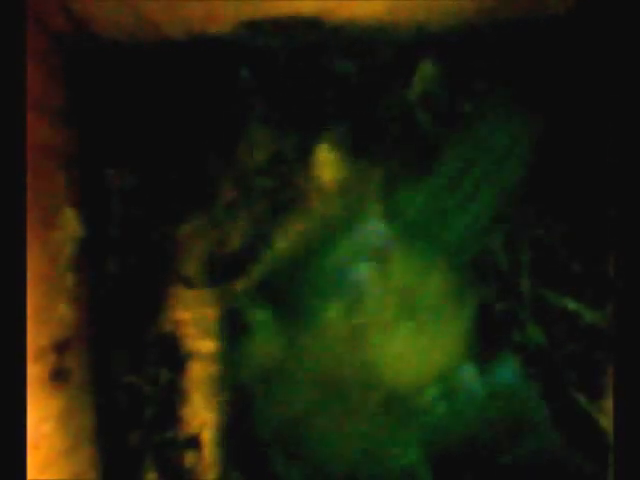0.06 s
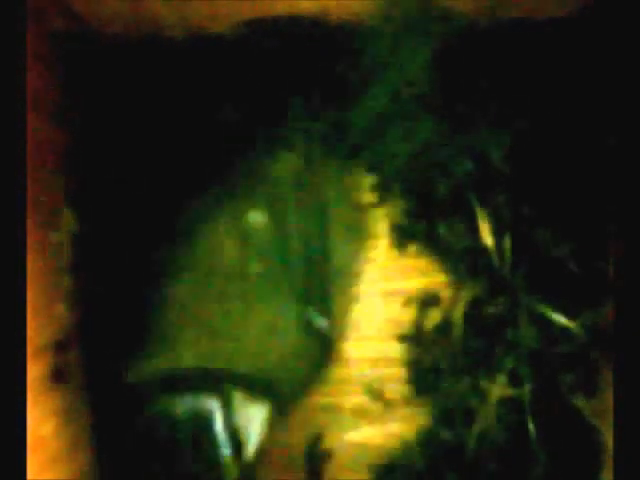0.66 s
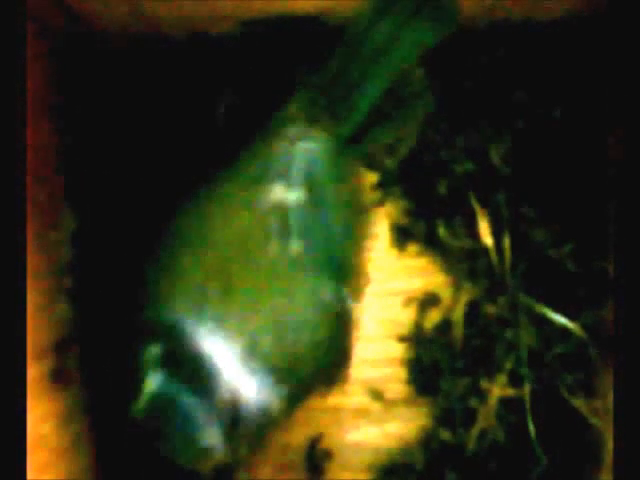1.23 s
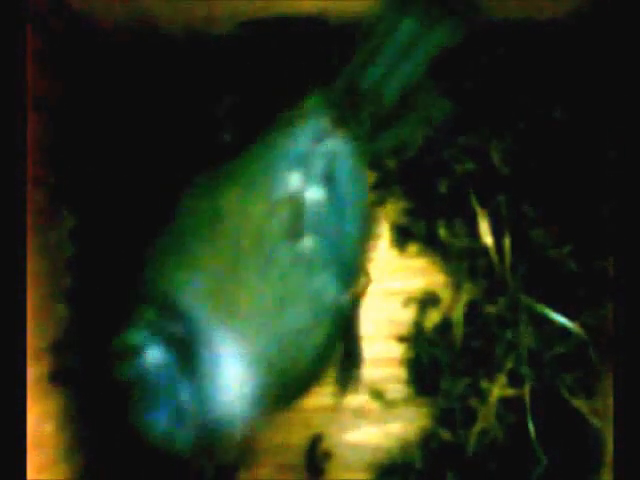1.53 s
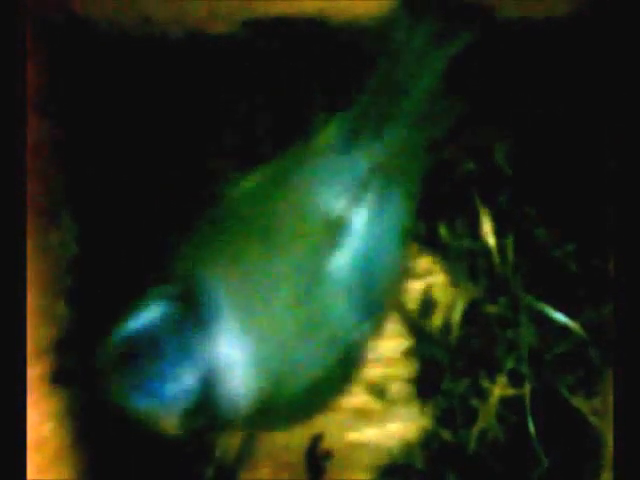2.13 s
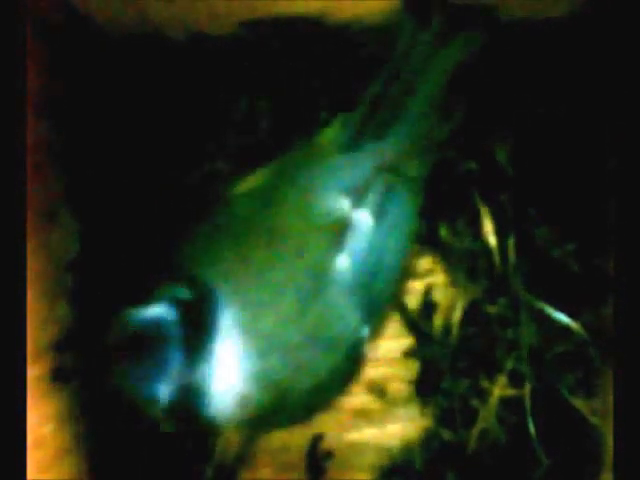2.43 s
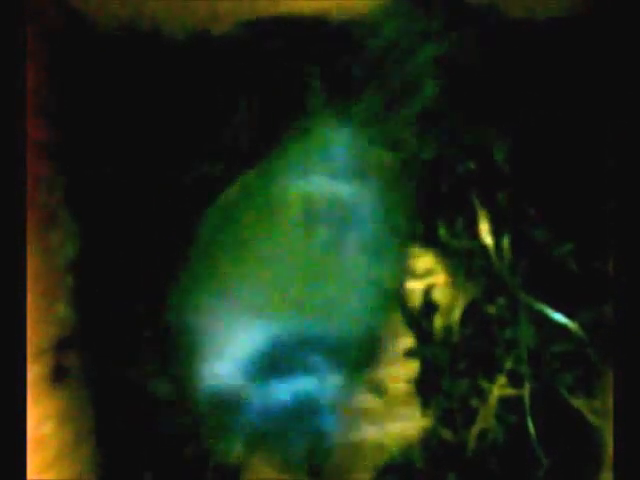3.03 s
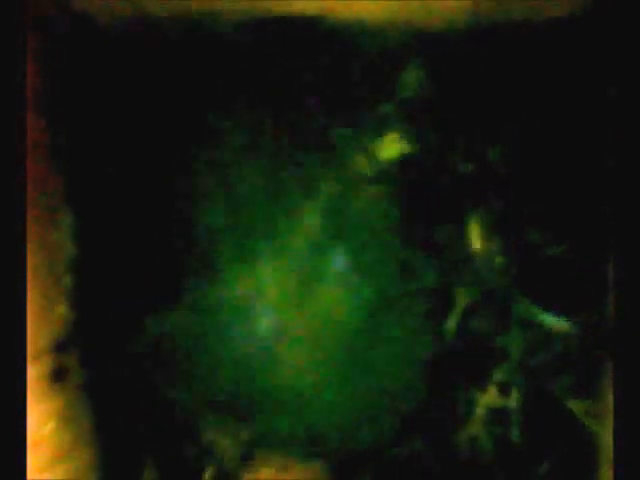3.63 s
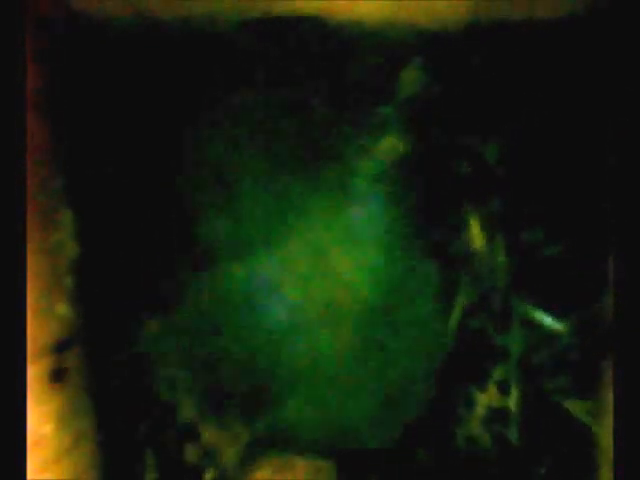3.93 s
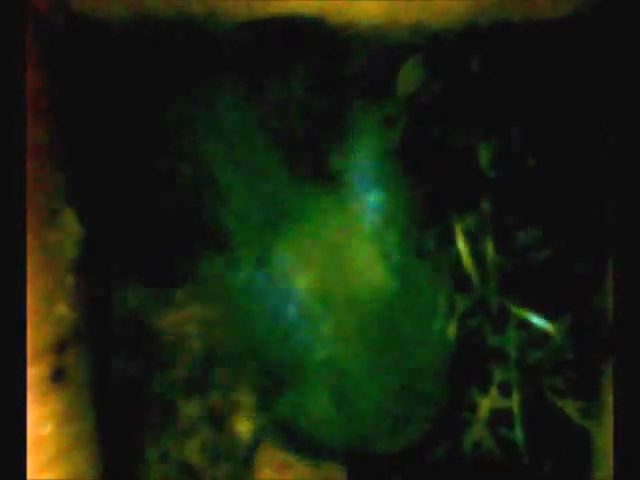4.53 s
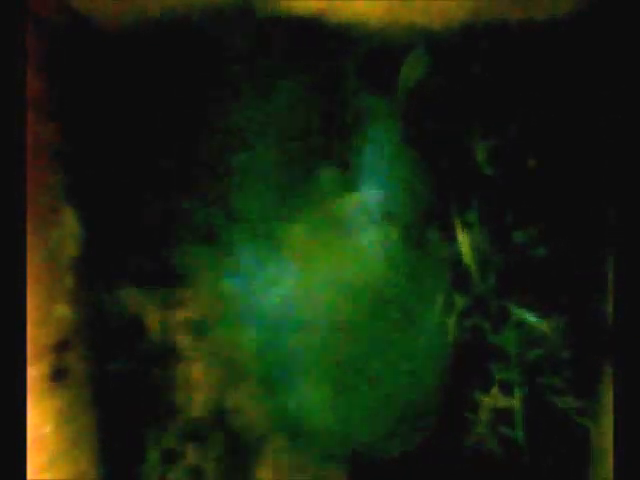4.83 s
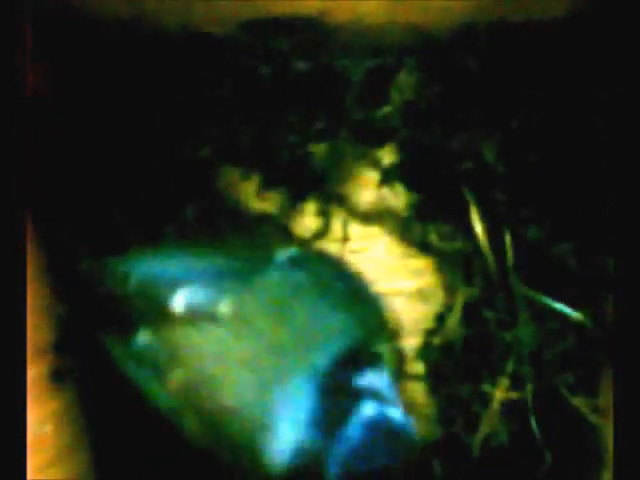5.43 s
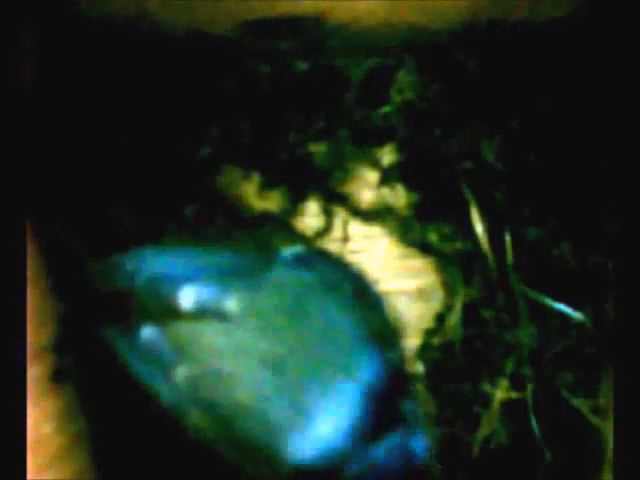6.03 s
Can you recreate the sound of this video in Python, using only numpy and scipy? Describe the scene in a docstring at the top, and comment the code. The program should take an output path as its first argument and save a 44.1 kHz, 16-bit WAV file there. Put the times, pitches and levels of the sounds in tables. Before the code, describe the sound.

A small bird moves inside a wooden nest box, very close to the microphone. For the first half second, dry stalks rustle and scrape over the boards with soft, hollow bumps, then thin to scattered claw ticks. From about 1.7 to 2.3 seconds come six quick, hard pecks, the loudest sounds, ringing the wooden walls and distorting slightly. After a lull with a few ticks, busy scratchy rustling and claw catches run from 3.2 to 5 seconds, ending in light ticks by 5.5 seconds.

A steady low outdoor rumble and the hollow hum of the box lie underneath, with a faint, thin electronic whine pulsing about eight times a second. Another bird gives three faint, short falling whistles at about 1.5, 2.1 and 2.8 seconds. A quiet, distant engine rises in pitch from about 2 to 5 seconds.

```python
"""Claws tick and dry stalks rustle as a small bird shuffles in a wooden nest box, right beside a tiny
microphone. Feathers and feet drag the nesting over the boards, and the bird's weight makes the box murmur.
Six hard pecks set the walls ringing and overload the microphone. From outside come a low rumble, a far
engine gathering speed and three faint whistles of another bird; the electronics add a thin pulsing whine."""
import sys
import numpy as np
from scipy import signal
from scipy.fft import rfft, irfft
from scipy.io import wavfile
from scipy.ndimage import uniform_filter1d

SR = 44100
rng = np.random.default_rng(int(sys.argv[2]) if len(sys.argv) > 2 else 0)


def waveform_to_disk(signal):
    """Save audio, clipped to [-1, 1], as 16-bit WAV at the path in sys.argv[1]."""
    frames = np.transpose(np.atleast_2d(signal))
    scaled = np.clip(frames, -1, 1) * 32767
    samples = np.round(scaled).astype(np.int16)
    wavfile.write(sys.argv[1], SR, samples)


N = 276507
TIME = np.arange(N) / SR

# Modes of the wooden box. Each row: frequency in Hz, relative level in dB, seconds to die away by 60 dB.
BOX_MODES = [(224, -46, 0.24), (216.4, -9, 0.21), (248.4, -11.5, 0.14), (277, -39, 0.35),
             (344.7, -13.5, 0.15), (390, -45, 0.02), (487.5, -12.5, 0.06), (781, -4, .069), (800, -13, .03),
             (1054, -14, 0.074), (1130, -45, 0.13), (1270, -35.5, 0.096), (1480, -25.5, 0.072),
             (1629, -25.5, 0.053), (1700, -19, 0.071), (1981, -4, 0.027), (2190, -32, 0.083),
             (2307, -14, 0.04), (2560, -57, 0.09), (2720, -28, 0.023), (3820, -13, 0.025),
             (5030, -15, .015)]
# Spectrum of dry stalks rubbing. Each row: frequency in Hz, relative level in dB.
FRICTION_SPECTRUM = [(400, -3), (1200, -6), (3200, -13), (4300, -0.5), (4900, -1.5), (5500, -2.5),
                     (6250, -7), (7200, -9.5), (7800, -10.5), (8550, 1), (9200, -3.5), (10200, -14.5),
                     (12500, -13.5), (16000, -27)]


def from_db(db):
    """Decibels as an amplitude factor."""
    return 10 ** (np.asarray(db) / 20)


def rms_one(x):
    """Scale a signal to rms 1."""
    return x / np.sqrt(np.mean(x ** 2) + 1e-20)


def coloured(x, spectrum):
    """Shape a texture with a spectrum of (Hz, dB) rows; rms 1."""
    hz, db = np.transpose(spectrum)
    bin_hz = np.maximum(np.arange(N // 2 + 1) * SR / N, 1)
    gain = from_db(np.interp(np.log(bin_hz), np.log(hz), db))
    return rms_one(irfft(rfft(x) * gain, N))


def drift(per_s):
    """A random wander between points of spread 1."""
    knots = rng.standard_normal(4096)
    return np.interp(TIME * per_s, np.arange(len(knots)), knots)


def swell(t, peak_s):
    """A quick rise to 1 and a longer fall."""
    return t / peak_s * np.exp(1 - t / peak_s)


def ring(force, hz, t60):
    """One mode: a unit click starts a dying sine of height about 1."""
    r, w = from_db(-60 / (t60 * SR)), 2 * np.pi * hz / SR
    return signal.lfilter([0, np.sin(w)], [1, -2 * r * np.cos(w), r * r], force + 1e-18)


def resonance(x, hz, width_hz):
    """Band-pass with gain 1 at its peak."""
    r, w = np.exp(-np.pi * width_hz / SR), 2 * np.pi * hz / SR
    return signal.lfilter(np.array([1, 0, -1]) * (1 - r * r) / 2, [1, -2 * r * np.cos(w), r * r], x + 1e-18)


def add(track, s, sound):
    """Mix a short sound in at s seconds."""
    i = max(round(s * SR), 0)
    track[i:i + len(sound)] += sound[:N - i]


def background(rumble_db=-34, hollow_db=-53):
    """Steady outdoor rumble and microphone hiss, with the hollow of the box humming along."""
    # Rumble and hiss. Each row: frequency in Hz, relative level in dB.
    floor_spectrum = [(15, 2.5), (35, 1.5), (62, 2), (90, -2.5), (130, -9.5), (250, -4), (320, -20),
                      (560, -32), (1200, -39), (1500, -31.5), (2300, -42.5), (8000, -44.5), (15500, -49)]
    rumble = coloured(rng.standard_normal(N), floor_spectrum)
    hollow = rms_one(resonance(rng.standard_normal(N), hz=783.3, width_hz=32))
    return from_db(rumble_db) * rumble + from_db(hollow_db) * hollow


def whine(start_s=0.055, period_s=0.12, on_s=0.034, on_db=(-63, -58), off_db=(-99, -82)):
    """Two thin tones from the microphone's electronics pulse about eight times a second."""
    # The two tones. Each entry: frequency in Hz.
    tones_hz = [8000, 15612]
    on = uniform_filter1d(1.0 * ((TIME - start_s) % period_s < on_s), size=60)
    levels = [on * from_db(high) + (1 - on) * from_db(low) for high, low in zip(on_db, off_db)]
    return sum(np.sqrt(2) * level * np.sin(2 * np.pi * hz * TIME) for hz, level in zip(tones_hz, levels))


def far_engine(third_db=-7.0, wobble=0.0085, flutter_db=2.5):
    """A distant engine speeds up; only its second and third harmonics get through the walls."""
    # The engine's climb. Each row: time in seconds, second harmonic in Hz, its level in dB.
    climb = [(1.901, 136, -52), (2.499, 152.6, -45.5), (3.102, 167, -41.5), (3.498, 180, -45),
             (3.999, 197.7, -49), (4.5, 220.9, -44), (5.0, 239.5, -50)]
    s, hz, db = np.transpose(climb)
    fundamental_hz = np.interp(TIME, s, hz) / 2 * (1 + wobble * drift(13))
    phase = 2 * np.pi * np.cumsum(fundamental_hz) / SR
    level = from_db(np.interp(TIME, s, db, left=-100, right=-100) + flutter_db * drift(9.3))
    third_fade = np.interp(TIME, [3.3, 3.9], [1, 0])
    third = from_db(third_db) * third_fade * np.sin(3 * phase)
    return np.sqrt(2) * level * (np.sin(2 * phase) + third)


def far_bird():
    """A bird some way off whistles pure notes that swell and slide down, faint through the walls."""
    # Each row: start in seconds, length in seconds, first and last pitch in Hz, peak level in dB.
    whistles = [(1.487, 0.076, 2860, 2620, -58), (2.064, 0.1, 2900, 2620, -60),
                (2.758, 0.14, 2860, 2620, -59.5)]
    out = np.zeros(N)
    for s, length, start_hz, end_hz, db in whistles:
        hz = np.geomspace(start_hz, end_hz, int(length * SR))
        note = np.sin(2 * np.pi * np.cumsum(hz) / SR)
        add(out, s, from_db(db) * np.hanning(len(hz)) * note)
    return out


def box(force, colour_db, low_cut_hz=132):
    """The walls ring in their modes, each raised or lowered by colour_db; so small a box has no deep bass."""
    modes = 0
    for (hz, db, t60), extra_db in zip(BOX_MODES, colour_db):
        polarity = -1 if 400 < hz < 920 else 1  # the middle modes swing against the rest
        modes = modes + polarity * from_db(db + extra_db) * ring(force, hz, t60)
    return signal.sosfilt(signal.butter(4, low_cut_hz, "high", fs=SR, output="sos"), modes)


def board(touch):
    """The thin board beside the microphone answers light touches, most strongly near 2 kHz."""
    # Board resonances. Each row: frequency in Hz, width in Hz, gain in dB.
    peaks = [(493, 32, -15.5), (763, 26.3, -1.5), (1513, 243, -9), (1921.6, 127, 9.5), (1995, 162, 8),
             (2195, 240, -6), (2408, 68, -4.5), (2620, 160, -22), (2927, 80, -16.5)]
    return sum((-1) ** k * from_db(db) * resonance(touch, hz, width)
               for k, (hz, width, db) in enumerate(peaks))


def shoves():
    """The bird's weight shoves the nest against the floor; the soft, rough pushes make the box murmur."""
    # Each row: peak time in seconds, half length in seconds, level in dB, tilt in dB per octave.
    pushes = [(0.043, 0.082, -35.5, -2), (0.207, 0.025, -32.5, -4.5), (0.302, 0.032, -35.5, -13),
              (0.497, .028, -29.5, -1.5), (3.023, .008, -34.5, -3), (4.027, 0.024, -34.5, -8),
              (4.544, .012, -37.5, 0)]
    out, t = np.zeros(N), TIME[:SR // 3]
    octaves = np.log2(np.array(BOX_MODES)[:, 0] / BOX_MODES[0][0])
    for s, half_s, db, tilt_db in pushes:
        start = max(s - 2 * half_s, 0)
        push = np.exp(-((t + start - s) / half_s) ** 2)
        murmur = box(push * rng.standard_normal(len(t)), tilt_db * octaves)
        add(out, start, from_db(db) * rms_one(murmur) * np.sqrt(np.mean(push ** 2)))
    return out


def grains(per_s, spread_db, smooth):
    """Tiny slips of uneven size over a share of smooth friction; rms 1."""
    sizes = from_db(spread_db * np.minimum(rng.exponential(1, N), 4)) * rng.choice([-1, 1], N)
    slips = rms_one(sizes * (rng.random(N) < per_s / SR))
    return rms_one(slips + smooth * rng.standard_normal(N))


def stalks(slips, wander_db=5.0, wander_per_s=60):
    """Each stalk takes its own part of every slip at its own pitch, so the stress wanders in the treble."""
    bands = []
    for hz in np.geomspace(3000, 14500, num=24):
        stalk = resonance(slips * rng.standard_normal(N), hz, width_hz=hz / 18)
        bands.append(stalk * from_db(wander_db * drift(wander_per_s)))
    return rms_one(sum(bands))


def stalk_colour(friction, turn_s=(3.9, 4.2)):
    """Broad friction with two narrow rings underfoot; their balance shifts as the bird turns round."""
    # Each row: frequency in Hz, nominal width in Hz, relative level in dB before and after the turn.
    stalk_rings = [(4746, 280, -15.5, -10), (6260, 346, -4, -6.5)]
    rings = 0
    for hz, width, *db in stalk_rings:
        band = resonance(resonance(friction, hz, 2 * width), hz, 2 * width)
        rings = rings + from_db(np.interp(TIME, turn_s, db)) * rms_one(band)
    return rms_one(coloured(friction, FRICTION_SPECTRUM) + rings)


def light_brushes(per_s=35, half_s=0.01, spread_db=3.5, hiss_db=-12):
    """Small uneven moves, as strong as the bird is restless; rows like the firm strokes in rustle()."""
    # The bird's restlessness. Each row: time in seconds, level of the brushing in dB.
    restlessness = [(0.0, -32), (0.5, -43), (0.75, -58.5), (1.7, -61), (2.1, -40.5), (2.45, -64),
                    (3.1, -53.5), (3.22, -39.5), (3.5, -37), (3.92, -43.5), (4.5, -45.5), (4.95, -39.5),
                    (5.14, -58), (5.5, -82)]
    jitter, board_scatter, hiss_scatter = rng.standard_normal((512, 3)).T
    s = (np.arange(len(jitter)) + 0.26 * jitter) / per_s
    db = np.interp(s, *np.transpose(restlessness))
    board_levels = db + spread_db * board_scatter
    hiss_levels = db + hiss_db + spread_db * hiss_scatter
    rows = np.transpose([s, np.full(len(s), half_s), board_levels, hiss_levels])
    return rows[s < restlessness[-1][0]]


def rustle(fall_to_rise=1.105, roundness=1.76, flutter_db=2.5, crackle_db=-10.0, crackle_from_hz=9000):
    """Feathers and feet drag stalks over the board at the microphone; the hardest strokes crackle on top."""
    # Each row: peak time in seconds, half length in seconds, board level in dB, hiss level in dB.
    firm_strokes = [(0.088, 0.017, -29, -31), (0.161, 0.0059, -48, -37), (0.204, 0.0091, -21.5, -32),
                    (0.28, 0.012, -26, -38), (0.304, 0.011, -27.5, -28.5), (0.372, 0.019, -38, -42.5),
                    (0.444, 0.01, -28, -38.5), (0.495, 0.041, -31, -46.5), (0.57, 0.07, -47.5, -53.5),
                    (0.804, 0.015, -37, -60), (0.985, 0.014, -38.5, -63), (1.802, 0.028, -35.5, -49),
                    (2.083, 0.013, -29.5, -43.5), (2.235, 0.02, -39.5, -53), (2.88, 0.0046, -33.5, -46.5),
                    (3.256, 0.0051, -23.5, -38.5), (3.435, 0.033, -39, -51), (3.499, 0.019, -33.5, -39.5),
                    (3.581, 0.015, -30, -30.5), (3.647, .012, -29.5, -35), (3.712, 0.043, -36, -42.5),
                    (3.855, 0.031, -32.5, -43), (3.915, 0.032, -39, -41), (4.014, 0.017, -28.5, -37.5),
                    (4.072, 0.015, -37, -41.5), (4.116, 0.013, -29.5, -35.5), (4.222, 0.023, -27, -32),
                    (4.315, 0.018, -32.5, -34), (4.422, 0.017, -27, -35), (4.478, 0.009, -38.5, -41.5),
                    (4.543, 0.01, -27, -37), (4.662, 0.029, -25, -35.5), (4.747, 0.0086, -42, -36.5),
                    (4.832, 0.015, -29, -40.5), (4.905, 0.017, -29, -37.5), (4.97, 0.033, -36.5, -49)]
    board_power, hiss_power = np.zeros(N), np.zeros(N)
    for s, half_s, board_db, hiss_db in [*firm_strokes, *light_brushes()]:
        near = slice(max(int((s - 0.2) * SR), 0), int((s + 0.2) * SR))
        t = TIME[near] - s
        width_s = half_s * np.where(t < 0, 1, fall_to_rise)
        power = np.exp(-2 * np.abs(t / width_s) ** roundness)  # roundness 1 is pointed, 2 a bell
        board_power[near] += from_db(board_db) ** 2 * power
        hiss_power[near] += from_db(hiss_db) ** 2 * power
    drag = grains(per_s=4000, spread_db=1.5, smooth=0.29)
    wood = np.sqrt(board_power) * rms_one(board(drag))
    slips = grains(per_s=1400, spread_db=3.5, smooth=0.55) * from_db(flutter_db * drift(200))
    hiss = np.sqrt(hiss_power) * stalk_colour(stalks(slips))
    treble = signal.sosfilt(signal.butter(2, crackle_from_hz, "high", fs=SR, output="sos"), slips)
    crackle = from_db(crackle_db) * hiss_power / np.sqrt(hiss_power.max()) * rms_one(treble)
    return wood + hiss + crackle


def claws(level_db=-0.5, scrape_db=-24.0, again_db=-19.5, skid_share=0.35, grip_hz=1990):
    """A claw catches, skids at a pitch of its own, catches again more lightly, and rings the board."""
    # Claws on wood. Each row: start in seconds, relative peak level in dB, skid time in seconds.
    catches = [(0.005, -16, 0.0035), (0.019, -28, 0.0061), (0.064, -17, 0.0033), (0.52, -20.5, 0.0021),
               (0.674, -34.5, 0.0077), (0.797, -24, 0.0039), (0.967, -27.5, 0.0041), (0.995, -23, 0.0023),
               (1.164, -41, .006), (1.224, -28.5, 0.0046), (1.248, -32, 0.0016), (1.29, -35, 0.011),
               (1.39, -30, 0.0062), (1.433, -40, 0.0091), (1.574, -36, 0.0043), (1.601, -37.5, .003),
               (1.823, -20.5, 0.0033), (2.024, -36, 0.0028), (2.113, -32, 0.0042), (2.268, -40, 0.0032),
               (2.417, -35.5, 0.002), (2.707, -36.5, .004), (2.908, -36, .004), (3.252, -15.5, 0.0056),
               (3.36, -26, 0.0036), (3.605, -22, 0.0015), (3.812, -25.5, 0.0052), (3.836, -23, 0.0018),
               (3.898, -19, 0.0026), (4.152, -25.5, 0.0022), (4.203, -8.5, 0.0063), (4.371, -18.5, 0.0039),
               (4.565, -14, 0.0031), (4.593, -21.5, 0.0012), (4.804, -23.5, .004), (5.087, -33, .007),
               (5.163, -39.5, 0.0037), (5.297, -38.5, 0.0075), (5.397, -32.5, 0.0073)]
    ticks, scrape, t = np.zeros(N), np.zeros(N), TIME[:SR // 12]
    delays_s = rng.uniform(0.0048, 0.013, len(catches))
    skids = rng.standard_normal((len(catches), len(t)))
    for (s, db, skid_s), delay_s, skid in zip(catches, delays_s, skids):
        rise_s = 0.44 * skid_s
        grip = swell(t, rise_s) + from_db(again_db) * swell(np.maximum(t - delay_s, 0), rise_s)
        force = (t == 0) + skid_share * skid * grip  # a click, then the rough skid
        pitch_hz = grip_hz * np.exp(0.026 * skid[-1])  # a little different for each catch
        tick = board(resonance(force, pitch_hz, width_hz=400))
        add(ticks, s, from_db(db + level_db) * tick / np.abs(tick).max())
        add(scrape, s, from_db(db + scrape_db) * grip)
    return ticks + scrape * coloured(rng.standard_normal(N), FRICTION_SPECTRUM)


def pecks(level_db=5.0, crack_db=-22.0, crack_rise_s=0.0025):
    """Close up, the beak cracks on wood and rebounds; where it lands weights the low and upper modes."""
    # Each row: start in seconds, relative strength in dB, contact in seconds, low thump in dB,
    # upper wall ring in dB, rebound delay in seconds, rebound against the hit in dB.
    blows = [(1.6918, -5, 0.00049, -8, 6, 0.0038, -22), (1.7779, 1.5, 0.00075, -9.5, 2.5, 0.0027, -15.5),
             (1.919, 6, 0.00024, -10, 1, 0.0038, -20), (2.0427, 1, 0.00043, -5.5, 4.5, 0.0018, -18),
             (2.1651, -2.5, 0.00041, -3.5, 7.5, 0.00376, -9),
             (2.3092, -8.5, 0.00045, -3.5, -1.5, .0013, -35)]
    # The splintery edge of a peck. Each row: frequency in Hz, relative level in dB.
    crack_spectrum = [(300, -28), (1200, -62), (2500, 6.5), (4500, 0.5), (7000, -14), (16000, -16.5)]
    knocks, crack, t = np.zeros(N), np.zeros(N), TIME[:SR // 3]
    hz = np.array(BOX_MODES)[:, 0]
    low, upper = hz < 400, (hz > 1000) & (hz < 1800)
    for s, db, contact_s, thump_db, wall_db, rebound_s, rebound_db in blows:
        hit = np.sin(np.pi * np.clip(t / contact_s, 0, 1)) ** 2
        rebound = np.sin(np.pi * np.clip((t - rebound_s) / contact_s, 0, 1)) ** 2
        force = (hit + from_db(rebound_db) * rebound) / hit.sum()
        colour_db = thump_db * low + wall_db * upper + rng.normal(0, 0.6, len(hz))
        add(knocks, s, from_db(level_db + db) * box(force, colour_db))
        add(crack, s, from_db(db + crack_db) * swell(t, crack_rise_s))
    return knocks + crack * coloured(rng.standard_normal(N), crack_spectrum)


def scene():
    """One microphone inside the box: the bird close by, the world outside beyond the walls."""
    bird = pecks() + rustle() + claws() + shoves()
    return (bird + far_engine() + far_bird() + background() + whine())[None]


def record(dry):
    """The overloaded preamplifier flattens the pecks; a steep filter cuts the very top."""
    ceiling, hardness, cutoff_hz = 0.86, 14, 16200
    flattened = dry / (1 + np.abs(dry / ceiling) ** hardness) ** (1 / hardness)
    return signal.sosfilt(signal.ellip(10, 0.1, 80, cutoff_hz, fs=SR, output="sos"), flattened)


dry = scene()
out = record(dry)
waveform_to_disk(out)
```